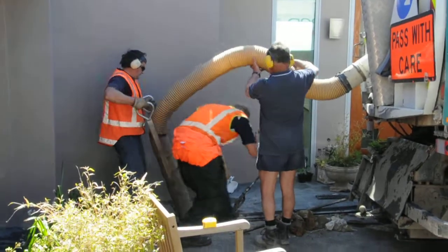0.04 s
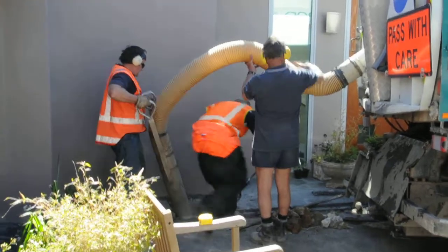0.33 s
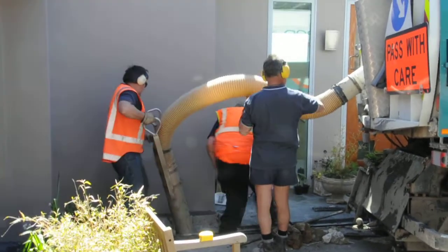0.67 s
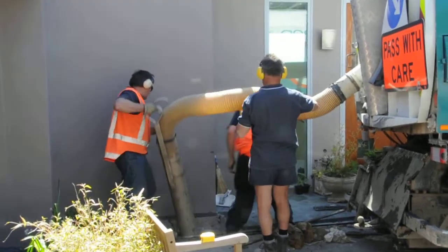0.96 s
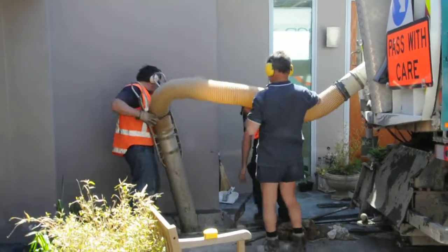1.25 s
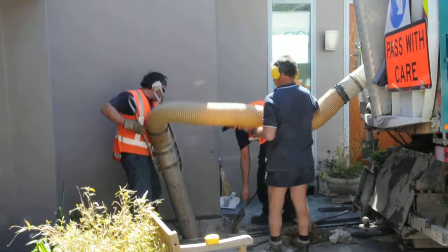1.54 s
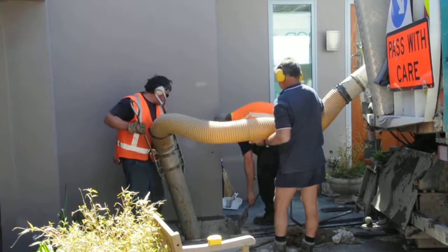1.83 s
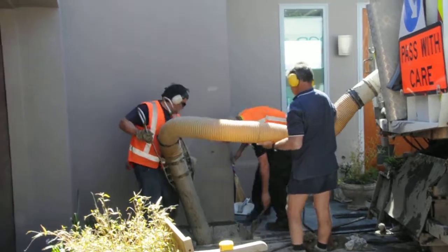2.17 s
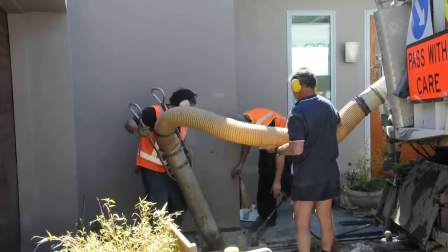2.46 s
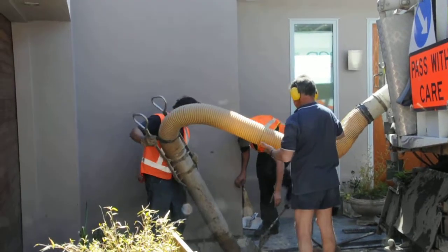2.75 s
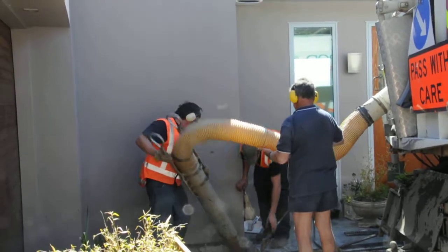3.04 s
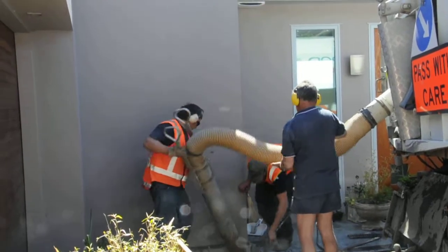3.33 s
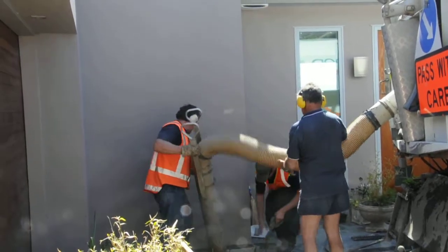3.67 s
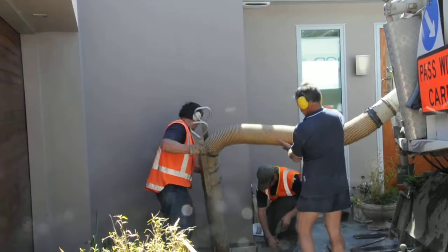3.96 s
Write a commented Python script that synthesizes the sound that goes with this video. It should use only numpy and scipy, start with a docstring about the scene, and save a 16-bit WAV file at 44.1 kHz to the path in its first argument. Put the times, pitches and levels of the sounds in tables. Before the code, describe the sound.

A suction excavator truck runs steadily in a walled yard, with a low diesel hum, a wavering blower drone and air roaring through its hose. A few stones hit the steel nozzle, then gravel rattles up near the end.

```python
"""A suction excavator truck runs at steady speed in a walled yard, sucking up the ground through a hose.
Its diesel engine hums and its blower holds a wavering drone of two main tones.
Air roars in the hose and tank, and the nozzle hisses more as it bites. A few clumps of gravel hit
the steel nozzle, then near the end a whole load rattles up the pipe. One tiny tick is heard early on."""
import sys
import numpy as np
from scipy import signal
from scipy.fft import rfft, irfft
from scipy.io import wavfile

SR = 44100
rng = np.random.default_rng(int(sys.argv[2]) if len(sys.argv) > 2 else 0)


def generate_wav(sig):
    """Save sig (samples, or channels by samples) to the path in sys.argv[1] as 16-bit PCM at SR."""
    pcm = np.round(np.clip(np.atleast_2d(sig).T, -1, 1) * 32767).astype(np.int16)
    wavfile.write(sys.argv[1], SR, pcm)


N = 176400
T = np.arange(N) / SR
HZ = np.fft.rfftfreq(N, 1 / SR)

# How hard the nozzle sucks, which lifts both hiss and grit: time_s, gain_db
SUCTION = [(0, -1.5), (.7, -3), (1.15, 0), (1.8, -1.3), (2.2, -1.5), (2.5, 0.5), (2.8, 1), (3.05, 0),
           (3.17, -0.5), (3.35, 3), (3.5, 1.5), (3.7, 5.5), (4, 0.5)]


def amp(db):
    """Turns decibels into a gain."""
    return 10 ** (np.asarray(db) / 20)


def unit(x):
    """Scales a signal to an average (rms) size of one."""
    return x / np.sqrt(np.mean(x ** 2) + 1e-20)


def curve(rows, column=1):
    """Joins the points of a time table, giving a value for every sample."""
    rows = np.array(rows)
    return np.interp(T, rows[:, 0], rows[:, column])


def spectrum(points):
    """Joins (pitch_hz, level_db) points, giving a gain for every frequency."""
    hz, db = np.transpose(points)
    return amp(np.interp(np.log(HZ + 1), np.log(hz), db))


def noise(gain):
    """Noise with the given strength at each frequency."""
    return irfft(rfft(rng.standard_normal(N)) * gain, N) * np.sqrt(SR / 2)


def wander(rate_hz):
    """A slow random wobble of size one, up to about the given rate."""
    return unit(noise((HZ > 0) / (1 + (HZ / rate_hz) ** 2) ** 2))


def tone(hz, db):
    """A pure tone that follows a pitch curve and a level."""
    return np.sqrt(2) * amp(db) * np.sin(2 * np.pi * (np.cumsum(hz) / SR + rng.random()))


def engine():
    """The diesel fires at a nearly even rate, which makes a low hum."""
    # Tones of the hum: multiple_of_firing_rate, level_db
    harmonics = [(1, -29), (2, -35.5)]
    firing_hz, wobble_db = 65.77, 1.07
    hz = firing_hz * (1 + .002 * wander(6))
    return sum(tone(multiple * hz, db - wobble_db * wander(14)) for multiple, db in harmonics)


def blower():
    """The blower's spinning lobes drone, fluttering in the moving air; thin whines follow its speed."""
    # How often the lobes pass: time_s, pitch_hz
    lobe_rate = [(0, 515), (.6, 515.5), (1.3, 514.5), (2.2, 513), (2.75, 510.6), (3.4, 516.5), (4, 515.6)]
    # Strength of the two main tones, before the offsets below: time_s, base_db, octave_db
    drone_levels = [(0, -23.5, -30), (.3, -23.5, -28), (.55, -22, -28.5), (.8, -22.5, -30.5),
                    (.95, -24, -32), (1.4, -25.5, -31), (1.68, -28, -28.5), (1.78, -22.5, -34),
                    (1.93, -26.5, -31), (2.3, -26.5, -35), (2.62, -24.5, -39.5), (2.73, -26, -27),
                    (2.81, -20.5, -39), (2.92, -28, -40), (3.15, -26, -32), (3.44, -24, -36),
                    (3.53, -23, -29.5), (4, -23.5, -34.5)]
    # Faint machinery whines: pitch_hz, level_db
    whine_tones = [(411.5, -40.5), (1086, -51.5), (1149, -55), (1394, -50), (1544, -57), (2173, -55.5),
                   (2660, -60.5)]
    hz = curve(lobe_rate) * (1 + .0009 * wander(25))
    base_db = curve(drone_levels)
    levels = [base_db, curve(drone_levels, column=2) + .5, base_db - 27.5]
    drone = sum(tone(multiple * hz, db + wander(13)) for multiple, db in enumerate(levels, 1))
    speed = hz / hz.mean()
    whines = sum(tone(pitch * speed * (1 + .002 * wander(15)), db + 1.2 * wander(3.3))
                 for pitch, db in whine_tones)
    return drone + whines


def tank_roar():
    """Swirling air booms at the pitches where the hose and tank naturally ring."""
    # Ringing bands of hose and tank: pitch_hz, nominal_width_hz, relative_level_db
    resonances = [(62.7, 18, -51.5), (122.3, 45, -50.5), (206.8, 31.5, -42.5), (246.4, 60, -39.5),
                  (289, 54, -38.5), (347, 32.7, -41.5), (369.7, 22, -43), (414, 8.1, -48),
                  (462.4, 22.8, -41.5), (516, 42, -55.5)]
    # Broad rumble under those bands: pitch_hz, relative_level_db
    rumble = [(20, -77.5), (33, -77), (50, -61.5), (90, -60), (165, -54), (300, -60), (410, -59.5),
              (600, -67.5), (1200, -94)]
    # Rise and fall of the roar, softened below: time_s, relative_level_db
    surges = [(0.06, -22), (0.09, -16.5), (0.16, -20), (1.4, -17.5), (1.43, -21), (1.57, -15.5),
              (1.76, -21.5), (1.86, -16.5), (1.89, -18), (2.48, -18), (2.93, -18), (3.0, -15.5),
              (3.18, -19.5), (3.94, -19.5)]
    ringing = sum(amp(db) ** 2 / (1 + ((HZ - hz) / (.75 * width)) ** 2) ** 3
                  for hz, width, db in resonances)
    power = spectrum(rumble) ** 2 + ringing
    swell_db = .8 * (curve(surges) - curve(surges).mean())
    return noise(np.sqrt(power)) * amp(swell_db - 1)


def hose_rush():
    """Air rushes along the hose, sounding brighter as it swells."""
    # Tone colour of the rush: pitch_hz, relative_level_db
    colour = [(300, -84), (560, -59.5), (610, -61.5), (655, -64.5), (715, -59.5), (800, -60.5),
              (855, -56.5), (910, -58.5), (1000, -57), (1120, -62.5), (1250, -65), (1450, -65.5),
              (1800, -69.5), (2600, -77.5), (5000, -105)]
    # Swell of the high part, which the low part follows less: time_s, gain_db
    swell = [(0, 1.5), (.55, 3), (.85, 2), (1.1, 0), (2, 0), (2.8, 0), (3.2, -2), (3.55, -2), (3.63, 0.5),
             (3.72, -1.5), (4, -.5)]
    split_hz, low_follow = 1040, .43
    low_share = 1 / (1 + (HZ / split_hz) ** 8)
    low = noise(spectrum(colour) * np.sqrt(low_share)) * amp(low_follow * curve(swell))
    high = noise(spectrum(colour) * np.sqrt(1 - low_share)) * amp(curve(swell))
    return (low + high) * amp(-.5 + .4 * wander(25))


def nozzle_hiss():
    """Air hisses into the nozzle, with a hollow note that comes and goes."""
    # Tone colour of the hiss: pitch_hz, relative_level_db
    colour = [(900, -85.5), (1600, -73), (2150, -69), (2700, -71), (2950, -73), (3550, -74), (4100, -78),
              (4500, -80.5), (4900, -86), (5400, -91)]
    # Strength of the hollow note: time_s, level_db_per_hz
    hollow_levels = [(0, -76.5), (.8, -77), (1.3, -68.5), (2.1, -71.5), (2.6, -67), (3, -66.5), (3.17, -77),
                     (3.4, -70.5), (4, -76)]
    hollow_hz, width_hz = 2220, 600
    hiss = noise(spectrum(colour)) * amp(curve(SUCTION) - 1.5 + .5 * wander(30))
    hollow_band = 1 / (1 + ((HZ - hollow_hz) / width_hz) ** 2) ** 2
    return hiss + noise(hollow_band) * amp(curve(hollow_levels))


def yard_echoes(sound):
    """Close walls send the sound back, boosting some pitches and weakening others."""
    # Echoes off the walls: delay_s, gain_db
    walls = [(.0082, -16.5), (.0185, -16.5), (.031, -19)]
    response = 1 + sum(amp(db) * np.exp(-2j * np.pi * HZ * delay) for delay, db in walls)
    return irfft(rfft(sound) * response, N)


def stone_strike():
    """One stone cracks against a random spot of the steel nozzle and makes it ring."""
    # Ringing tones of the nozzle: pitch_hz, relative_level_db, ring_s (time to fall by 60 dB)
    steel_tones = [(1509, -3, 0.05), (2190, -3.5, 0.02), (2640, 1, .035), (3210, -2.5, 0.023),
                   (3657, 0.5, .025), (4150, -3.5, 0.0098), (4730, -4.5, .025)]
    detune, crack_db, crack_s = .04, 3, .0016
    t = T[:SR // 16]
    ring = np.zeros(len(t))
    for hz, db, ring_s in steel_tones:
        fade = amp(db + rng.standard_normal() - 60 * t / ring_s)
        spot_hz = hz * (1 + detune * rng.standard_normal())
        ring += fade * np.sin(2 * np.pi * (spot_hz * t + rng.random()))
    crack = amp(crack_db) * rng.standard_normal(len(t)) * np.exp(-t / crack_s)
    return (ring + crack) / np.sqrt(len(steel_tones))


def stone_hail(hits_per_s):
    """Stones of mixed sizes hail steadily on many spots of the nozzle."""
    spots = 20
    hail = np.zeros(N)
    for _ in range(spots):
        hits = rng.random(N) < hits_per_s / spots / SR
        size_db = 4 * np.minimum(rng.exponential(1, N), 2)
        hail += signal.oaconvolve(hits * amp(size_db), stone_strike())[:N]
    return unit(hail)


def gravel():
    """Each clump lands with one big stone, thuds in the hose and scatters, over a trickle of grit."""
    # Clumps hitting the pipe: start_s, relative_level_db, scatter_fade_s
    clumps = [(1.158, -37.5, 0.018), (1.697, -40, .012), (1.755, -38.5, 0.052), (2.76, -44.5, .04),
              (3.2345, -32, .02), (3.276, -36, .04), (3.316, -31, .03), (3.369, -29, .04),
              (3.4635, -33, .015), (3.502, -36.5, 0.027), (3.591, -29, 0.03), (3.61, -34, .015),
              (3.6243, -25, 0.037), (3.681, -33, 0.041), (3.756, -33.5, 0.037), (3.776, -31.5, .045),
              (3.85, -35, .02)]
    rise_s, thud_hz, thud_fade_s = .0016, 110, .05
    scatter_power, thud_power, big_stones = np.zeros((3, N))
    for start_s, db, fade_s in clumps:
        age = np.maximum(T - start_s, 0)
        onset = amp(db) * np.minimum(age / rise_s, 1)
        scatter_power += (onset * np.exp(-age / fade_s)) ** 2
        thud_power += (onset * np.exp(-age / thud_fade_s)) ** 2
        first = round(start_s * SR)
        stone = amp(db + 5) * stone_strike()[:N - first]
        big_stones[first:first + len(stone)] += stone
    thud_band = 1 / (1 + (2 * (HZ / thud_hz - 1)) ** 4)
    thuds = amp(-1) * np.sqrt(thud_power) * unit(noise(thud_band))
    scatter = np.sqrt(scatter_power) * stone_hail(hits_per_s=900)
    grit = amp(curve(SUCTION) - 51.5) * stone_hail(hits_per_s=60)
    return big_stones + thuds + scatter + grit


def tick():
    """One tiny dry tick, brighter than everything else."""
    start_s, soften_hz, top_hz = 1.039, 3000, 16000
    spike = np.arange(N) == round(start_s * SR)
    softened = signal.lfilter([1], [1, -np.exp(-2 * np.pi * soften_hz / SR)], spike)
    return amp(-15) * signal.oaconvolve(softened, signal.firwin(101, top_hz, fs=SR), "same")


def scene():
    """Truck, air and gravel in one channel; only the rush and hiss echo off the walls."""
    mix = engine() + blower() + tank_roar() + yard_echoes(hose_rush() + nozzle_hiss()) + gravel()
    return mix[None]


def record(dry):
    """A small microphone loses the high treble; the bright tick is added afterwards."""
    # How well the microphone picks up each pitch: pitch_hz, gain_db
    microphone = [(4800, 0), (5100, -3), (5300, -10.5), (5500, -24.5), (5850, -18.5), (6200, -20)]
    top_hz = 6100
    dull = irfft(rfft(dry) * spectrum(microphone), N)
    treble_cut = signal.firwin(301, top_hz, window=("kaiser", 8), fs=SR)
    return signal.oaconvolve(dull, treble_cut[None], "same") + tick()


dry = scene()
out = record(dry)
generate_wav(out)
```